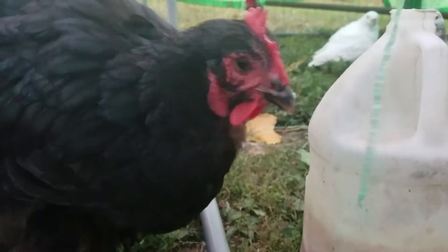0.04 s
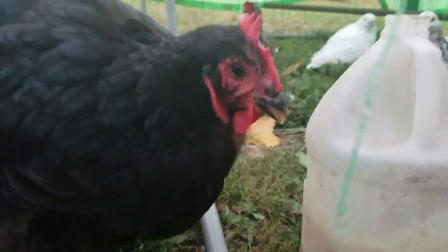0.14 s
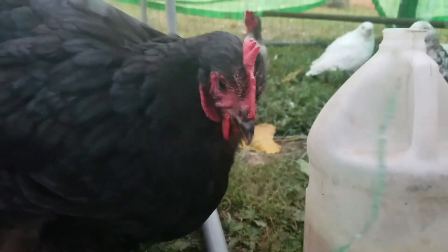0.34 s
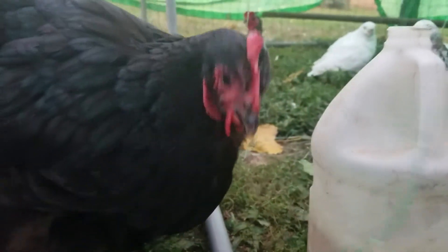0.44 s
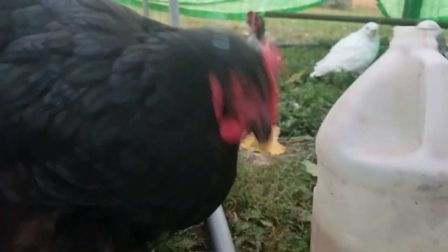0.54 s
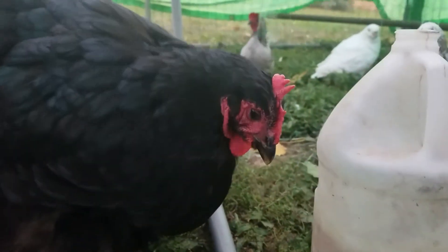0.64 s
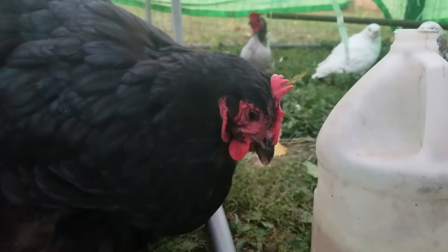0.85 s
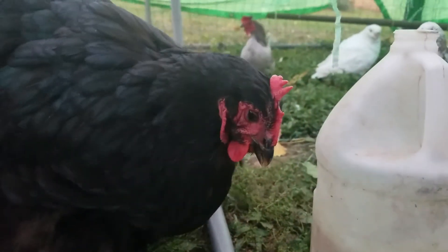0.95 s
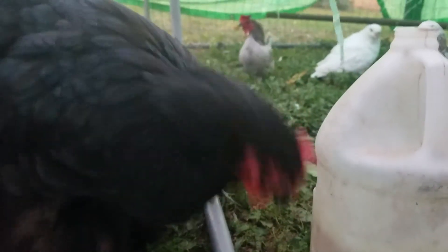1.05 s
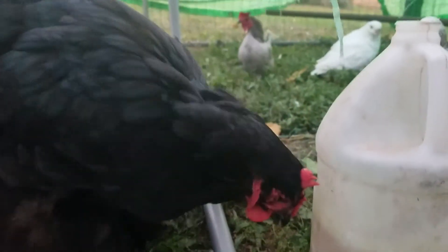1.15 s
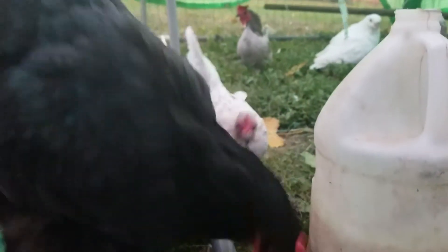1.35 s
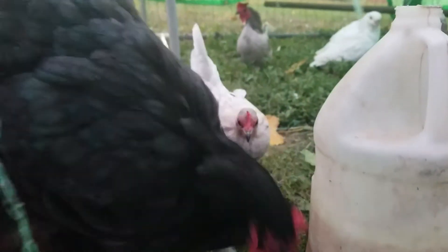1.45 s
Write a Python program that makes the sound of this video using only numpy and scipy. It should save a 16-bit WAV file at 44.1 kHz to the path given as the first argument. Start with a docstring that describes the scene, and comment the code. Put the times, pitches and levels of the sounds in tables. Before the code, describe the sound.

Dried feed rustles in a container close to the microphone, in two surges, with a loud dull knock just after the first. It thins to a crackling trickle while a hen pecks faintly on grass in quiet outdoor air.

```python
"""Over quiet outdoor air, dried feed is handled in a container close to a phone.
It rustles in two surges as countless brittle pieces click together and make the container ring.
A loud, dull knock lands just after the first surge peaks; three faint ones come earlier and later.
The rustle thins to a trickle, while single pieces crackle and a hen pecks on the grass.
At the end a low rumble swells."""
import sys
import numpy as np
from scipy import signal
from scipy.fft import rfft, irfft, next_fast_len
from scipy.io import wavfile
from scipy.ndimage import uniform_filter1d, map_coordinates

SR = 44100
rng = np.random.default_rng(int(sys.argv[2]) if len(sys.argv) > 2 else 0)


def log_audio(samples):
    """Write samples as a 16-bit WAV file to the path given in sys.argv[1]."""
    # one column per channel
    frames = np.atleast_2d(samples).T
    # limit to full scale, then quantise
    limited = np.clip(frames, -1, 1)
    pcm = np.round(limited * 32767).astype(np.int16)
    wavfile.write(sys.argv[1], SR, pcm)


N = 66150

# The tone of sliding feed. Each row: frequency in Hz, relative strength in dB.
FEED_TONE = [(200, -32.5), (950, -16), (1350, -6), (1700, -5.5), (2200, -0.5), (2700, -3.5), (3500, -3),
             (5500, -6.5), (7200, -10.5), (8500, -21), (11000, -19.5), (16000, -29)]
# The container's natural notes. Each row: pitch in Hz, seconds to fade by 60 dB,
# relative strength in dB when knocked, relative strength in dB when rubbed.
CONTAINER_NOTES = [(392, .032, -3, 3.5), (440, .03, 2.5, 3.5), (775, .011, 9, 3), (1157, .012, -1, -8),
                   (1420, .019, 4, 0), (2200, .017, -1, -5), (2690, .018, -18, 5.5)]
CONTACTS_PER_S = 6000
LEFT_DELAY_MS = .11  # the feed's sound reaches the left microphone later


def undb(db):
    """Turn decibels into a number to multiply by."""
    return 10 ** (np.asarray(db) / 20)


def unit(x):
    """Scale a sound to an average (rms) level of 1."""
    return x / np.sqrt(np.mean(x ** 2))


def clock():
    """The time of every sample in seconds."""
    return np.arange(N) / SR


def curve(table):
    """Join rows of (seconds, value) with straight lines."""
    return np.interp(clock(), *np.array(table).T)


def ramp(start, end):
    """Rise from 0 to 1 between two times in seconds."""
    return np.clip((clock() - start) / (end - start), 0, 1)


def fade(t, fade_s):
    """Die away by 60 dB every fade_s seconds."""
    return np.exp(-np.log(1000) * t / fade_s)


def pan(db):
    """Left and right gains that make the left side db decibels louder."""
    return undb(np.array([[db], [-db]]) / 2)


def colour(x, points):
    """Shape a sound's tone to follow rows of (Hz, dB)."""
    size = 2 * next_fast_len(x.shape[-1])
    hz, db = np.array(points).T
    freqs = np.maximum(np.fft.rfftfreq(size, 1 / SR), 1)
    gain = undb(np.interp(np.log(freqs), np.log(hz), db))
    # Fold the filter forward in time, so nothing rings before its click.
    cepstrum = irfft(np.log(gain))
    cepstrum[1:size // 2] *= 2
    cepstrum[size // 2 + 1:] = 0
    return irfft(rfft(x, size) * np.exp(rfft(cepstrum)))[..., :x.shape[-1]]


def cut_bass(x, hz, order):
    """Turn down everything below hz; a higher order cuts more steeply."""
    return signal.sosfilt(signal.butter(order, hz, "high", fs=SR, output="sos"), x)


def two_mics(x, delay_ms=LEFT_DELAY_MS):
    """One sound at both microphones, the left one late."""
    left = map_coordinates(x, [np.arange(len(x)) - delay_ms * SR / 1000], order=3)
    return np.array([left, x])


def add(out, x, at):
    """Mix in a short stereo sound at a time in seconds."""
    i = int(at * SR)
    out[:, i:i + x.shape[1]] += x[:, :N - i]


def outdoors():
    """Quiet open air, much alike in both ears in the bass; a low rumble swells at the end."""
    # The tones of the air and the rumble. Each row: frequency in Hz, relative strength in dB.
    air_tone = [(25, -15), (55, -10), (92, 1.5), (125, -4), (180, -3.5), (400, -6), (700, -5), (1100, -14),
                (2500, -15), (6500, -17), (8500, -26.5), (16000, -19)]
    rumble_tone = [(30, -30), (70, -1), (100, 3.5), (135, 4), (220, -11), (600, -58.5)]
    shared, side, rumble_noise = rng.standard_normal((3, N))
    side = .71 * cut_bass(side, hz=1470, order=1) + .34 * side  # the ears differ more in the treble
    air = unit(colour(np.array([shared + side, shared - side]), air_tone))
    rumble = unit(colour(rumble_noise, rumble_tone)) * ramp(1.29, 1.73)
    return air * undb(-48.5) + rumble * undb(-45.5)


def clicks(per_s):
    """A dense stream of tiny contacts, mostly weak and a few strong."""
    strength_db = 4.5 * np.minimum(rng.exponential(size=N), 5)
    hits = rng.random(N) < per_s / SR
    return unit(hits * undb(strength_db) * rng.choice([-1, 1], N))


def grains(per_s, tone):
    """Clicks from three spots across the heap, plus scattered ones that differ at each microphone."""
    heap = unit(sum(two_mics(clicks(per_s), LEFT_DELAY_MS + extra_ms) for extra_ms in (-.04, 0, .04)))
    scattered = undb(.5) * np.array([clicks(per_s), clicks(per_s)])
    return unit(colour(heap + scattered, tone))


def rustle():
    """Stirred pieces click together; the sliding mass thins to a sparser trickle."""
    # How hard the feed is stirred. Each row: time in seconds, level in dB.
    stirring = [(0, -52.5), (.09, -51.5), (.113, -42.5), (.15, -50.5), (.19, -42.5), (.225, -28),
                (.255, -26), (.285, -18), (.315, -26.5), (.37, -35), (.435, -31.5), (.465, -33.5),
                (.52, -25.5), (.555, -29), (.59, -22), (.635, -30), (.675, -28), (.74, -36), (.865, -31),
                (.915, -34), (.975, -44), (1.055, -44.5), (1.175, -41.5), (1.26, -57.5), (1.4, -57)]
    # The tone of the trickle. Each row: frequency in Hz, relative strength in dB.
    trickle_tone = [(200, -41), (1000, -19), (1700, -6.5), (2300, 2), (2900, -4), (4000, -6.5),
                    (6800, -10.5), (8500, -19), (10500, -18), (16000, -30)]
    thinning = ramp(.47, .92)
    sliding = np.sqrt(1 - thinning) * grains(CONTACTS_PER_S, FEED_TONE)
    trickle = np.sqrt(thinning) * grains(per_s=2800, tone=trickle_tone)
    return (sliding + trickle) * undb(curve(stirring)) * pan(.6)


def container_ring(notes):
    """One contact sets off fading notes, given as rows of (Hz, fade seconds, dB)."""
    t = clock()[:SR // 10]
    return sum(undb(db) * fade(t, fade_s) * np.cos(2 * np.pi * hz * t) for hz, fade_s, db in notes)


def rubbed(notes, levels):
    """Countless contacts keep notes ringing; their pitch wanders as the load shifts."""
    ring = signal.fftconvolve(clicks(CONTACTS_PER_S), container_ring(notes))
    hold = SR // 25  # a new pitch 25 times a second
    steps = np.repeat(rng.standard_normal(N // hold + 1), hold)
    speed = 1 + .025 * uniform_filter1d(steps, hold)[:N]
    wandering = map_coordinates(ring, [np.cumsum(speed)], order=3)
    return two_mics(unit(wandering) * undb(curve(levels)))


def container_rub():
    """Sliding feed rings the container's low, hollow notes and, where it scrapes, its walls."""
    # How loud the hollow and the walls ring. Each row: time in seconds, level in dB.
    hollow_levels = [(0.08, -63), (0.117, -42), (0.15, -62), (0.28, -31.5), (0.35, -48.5), (0.46, -39),
                     (0.59, -37.5), (0.72, -52), (0.92, -54), (1.25, -64.5)]
    wall_levels = [(.2, -65), (.28, -27.5), (.37, -44), (.52, -39), (.555, -32), (.6, -28.5), (.665, -35.5),
                   (.75, -62)]
    wall_above_hz = 1000
    low = [(hz, fade_s, db) for hz, fade_s, _, db in CONTAINER_NOTES if hz < wall_above_hz]
    high = [(hz, fade_s, db) for hz, fade_s, _, db in CONTAINER_NOTES if hz >= wall_above_hz]
    return rubbed(low, hollow_levels) * pan(-4) + rubbed(high, wall_levels) * pan(-.5)


def knocks():
    """Cushioned blows on the container; a longer contact sounds duller."""
    # Each row: start in seconds, level in dB, contact time in ms, lean to the left in dB.
    blows = [(.1125, -40, 1.0, 0), (.2003, -28.5, .9, 0), (.3238, .5, .27, -2), (1.1995, -28.5, 1.45, -1)]
    out, t = np.zeros((2, N)), clock()[:SR // 100]
    ring = container_ring([note[:3] for note in CONTAINER_NOTES])
    for at, db, contact_ms, pan_db in blows:
        push = np.sin(np.pi * np.minimum(t * 1000 / contact_ms, 1)) ** 2
        knock = np.convolve(ring, push)
        add(out, two_mics(knock / np.abs(knock).max()) * undb(db) * pan(pan_db), at)
    return out


def crackles_and_pecks():
    """Each brittle piece or beak tap is a bright snap, a brief ring and a scatter of crumbs."""
    # Each row: start in seconds, level in dB, ring pitch in Hz,
    # snap compared with the ring in dB, lean to the left in dB.
    taps = [(0.1651, -34.5, 4600, -7.5, 13), (.1752, -40, 5950, 15, -7), (0.1791, -32, 5560, 0, 11),
            (0.1822, -39, 4100, 21, 2), (.214, -34, 4900, 2, -9), (0.2202, -34, 3720, -11, 25),
            (0.234, -29.5, 3700, -27, -19.5), (0.2379, -24, 4380, -6, 17), (0.7726, -32, 2200, -6, -7),
            (0.8155, -36.5, 4670, -17, 15.5), (0.9195, -26, 2340, -5, 2), (0.9366, -37, 3700, 22, 1),
            (0.9714, -27.5, 2650, -15.5, -1), (1.017, -32, 2150, -0.5, -3), (1.0286, -33.5, 6040, 1.5, 7),
            (1.0348, -44.5, 1980, 2, -16), (1.0674, -34, 2460, -5, 2), (1.096, -41.5, 7800, 4, 5),
            (1.1253, -34.5, 13100, 3, 2.5), (1.143, -43, 3300, 12, -11), (1.1541, -39.5, 3400, 6, 9.5),
            (1.1871, -39, 2280, 10.5, 2), (1.2157, -43, 5700, -9, 9.5), (1.227, -40, 5500, 0, 1),
            (1.343, -43, 2740, -2, 0), (1.36, -48.5, 5100, 6, 0)]
    # The tone of a snap. Each row: frequency in Hz, relative strength in dB.
    snap_tone = [(150, -9), (1400, -3.5), (3000, 0.5), (7000, 2.5), (8500, -6.5), (12000, -10),
                 (16000, -12.5)]
    out, t = np.zeros((2, N)), clock()[:SR // 20]
    burst_gain = np.sqrt(.005 / t[-1])  # levels count as if all the energy came within 5 ms
    for at, db, hz, snap_db, pan_db in taps:
        noise = rng.standard_normal((4, len(t)))
        octaves = min(.125 * hz / 1000, .5)  # small, high pieces ring over a wider band
        edges_hz = np.minimum(hz * 2 ** (np.array([-.5, .5]) * octaves), SR / 2 - 1)
        band = signal.butter(3, edges_hz, "band", fs=SR, output="sos")
        ring = unit(signal.sosfilt(band, noise[0] * fade(t, .016)))
        snap = unit(colour(noise[1] * fade(t, .0068), snap_tone)) * undb(snap_db)
        crumbs = unit(colour(noise[2:] * fade(t, .029), FEED_TONE)) * undb(snap_db / 2 - 5.5)
        sound = two_mics(unit(ring + snap)) + crumbs
        add(out, sound * burst_gain * undb(db) * pan(pan_db), at)
    return out


def scene():
    """Feed, container and pecks over the open air; the small container gives off little bass."""
    container = cut_bass(container_rub() + knocks(), hz=315, order=5)
    return rustle() + container + crackles_and_pecks() + outdoors()


def record(dry):
    """The phone cuts off the highest treble."""
    top_hz = 15700
    return signal.sosfilt(signal.ellip(10, .2, 80, top_hz, fs=SR, output="sos"), dry)


dry = scene()
out = record(dry)
log_audio(out)
```